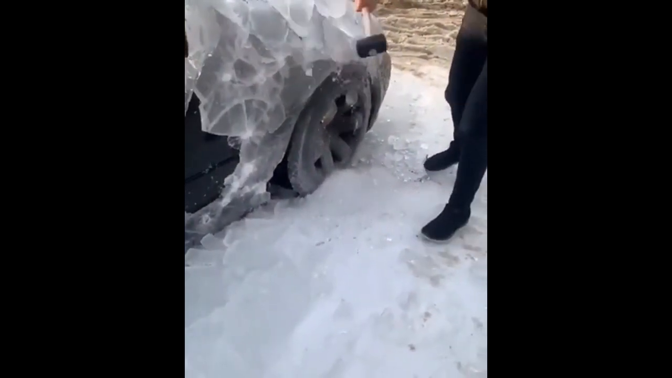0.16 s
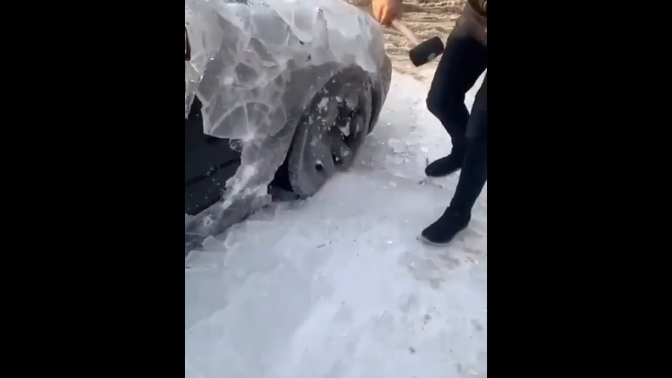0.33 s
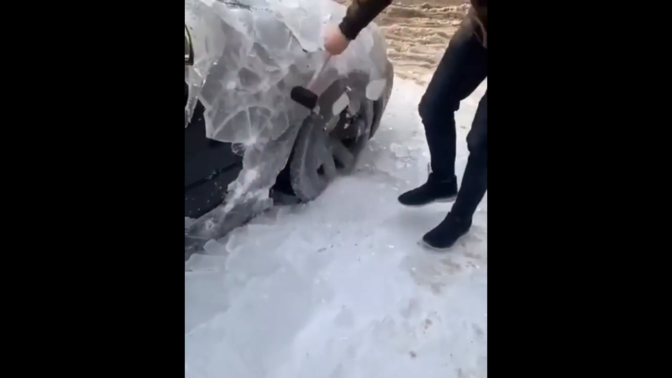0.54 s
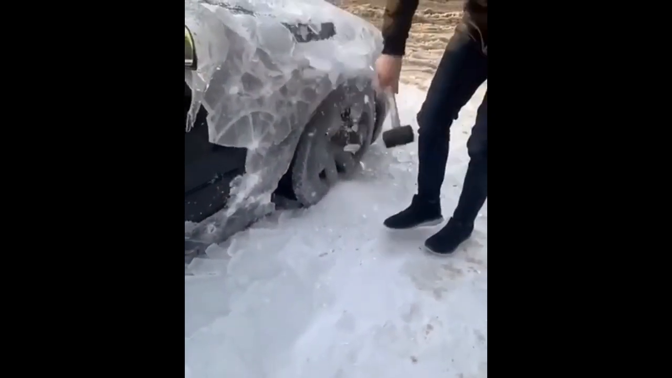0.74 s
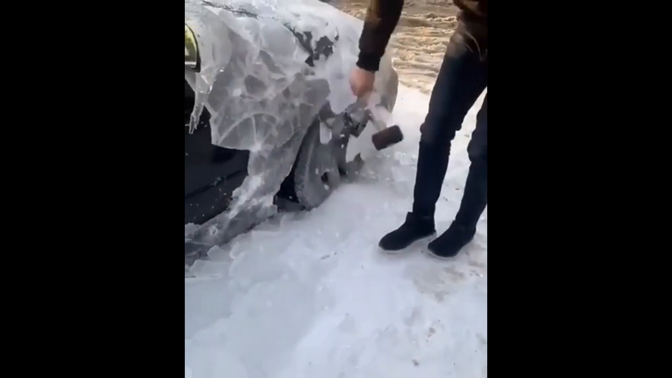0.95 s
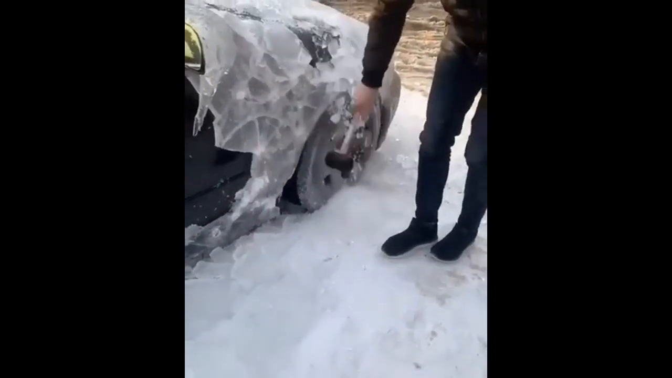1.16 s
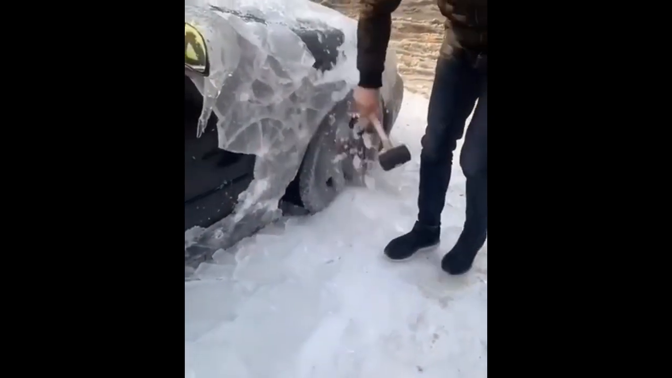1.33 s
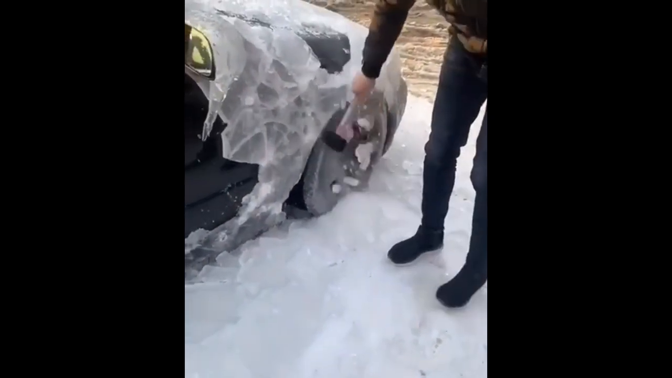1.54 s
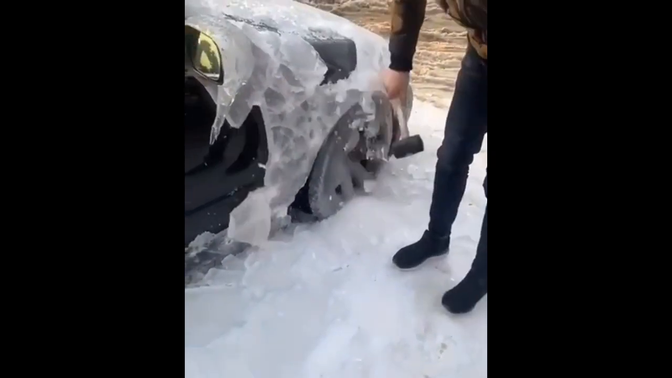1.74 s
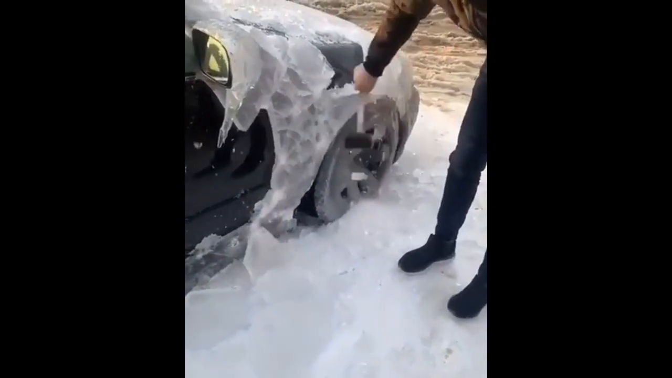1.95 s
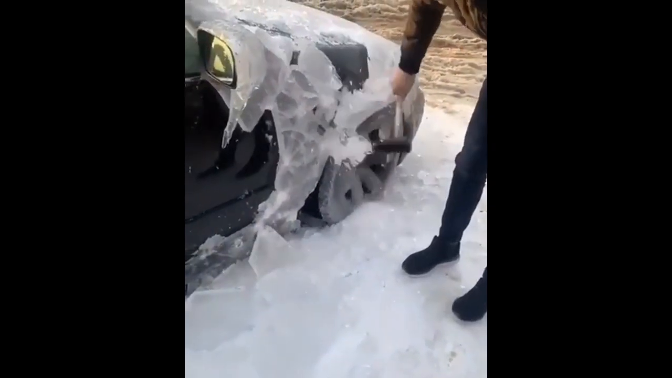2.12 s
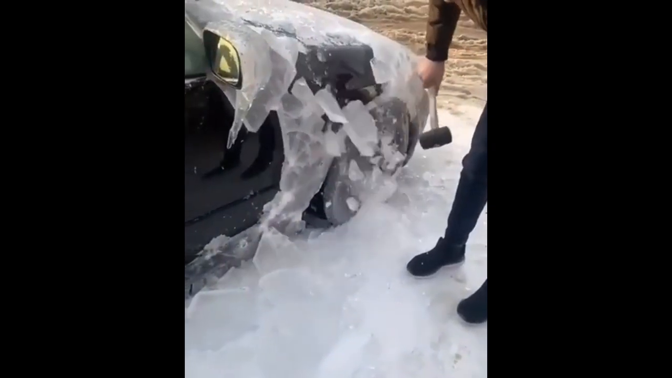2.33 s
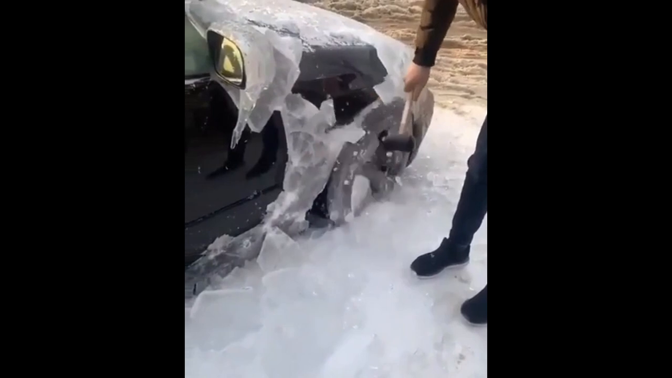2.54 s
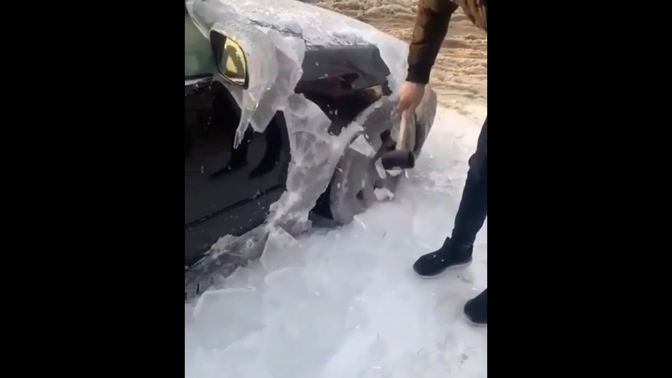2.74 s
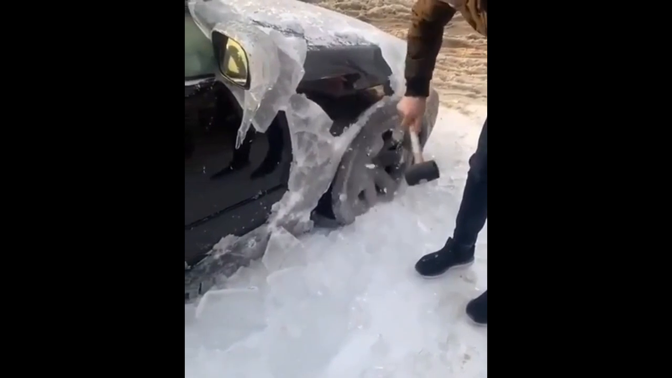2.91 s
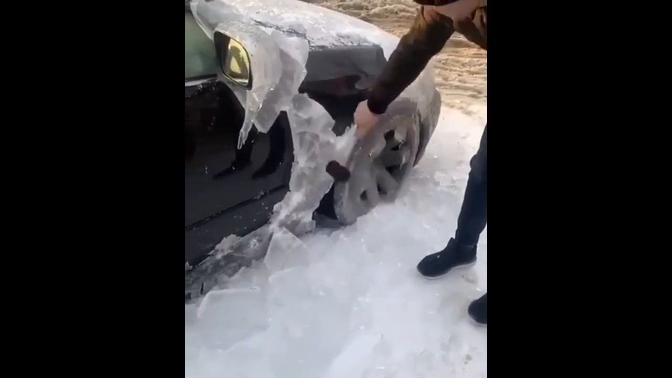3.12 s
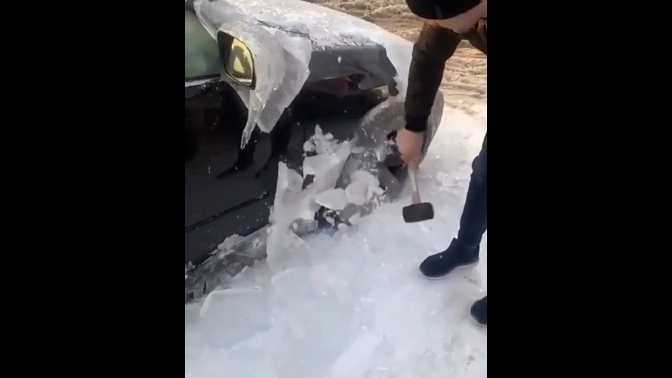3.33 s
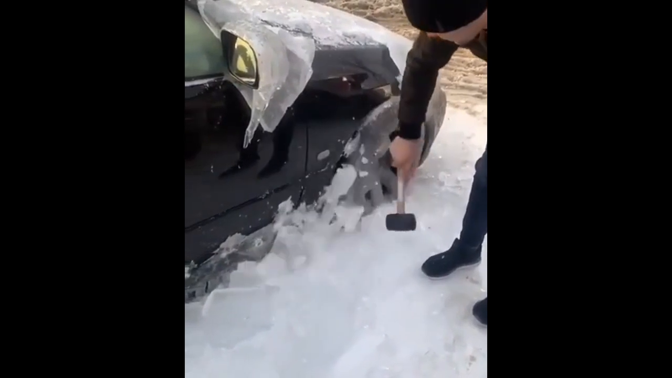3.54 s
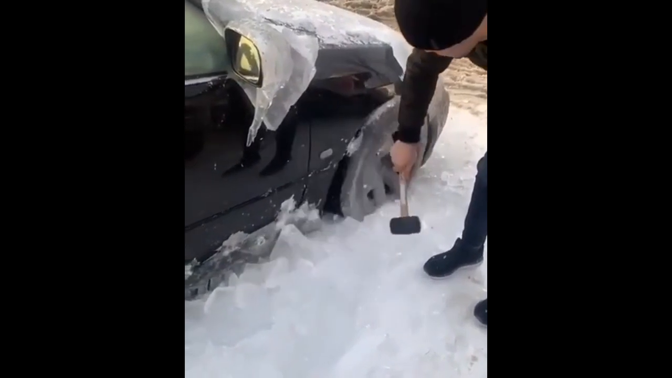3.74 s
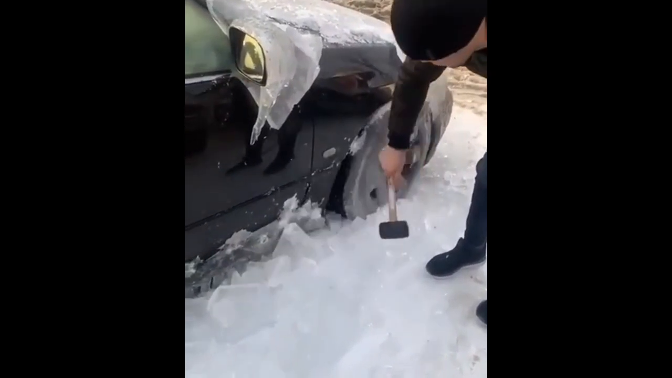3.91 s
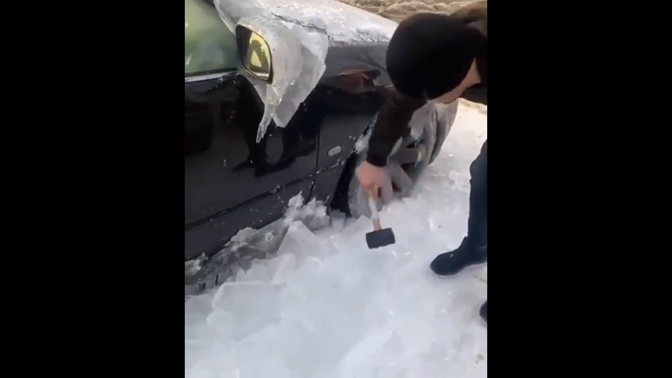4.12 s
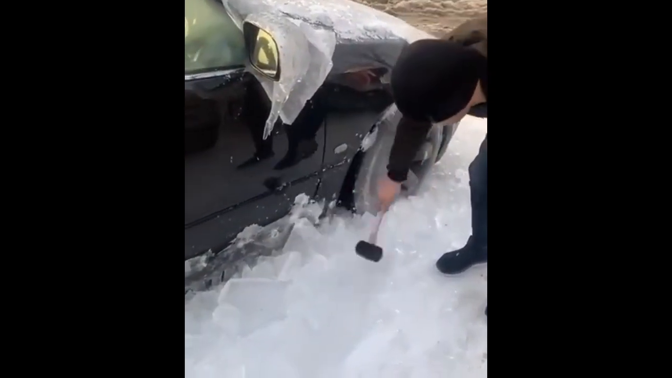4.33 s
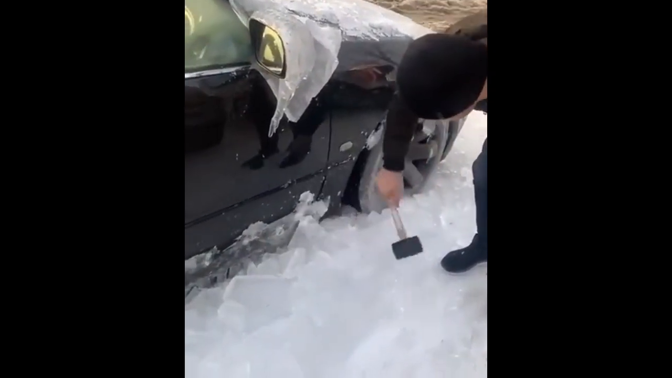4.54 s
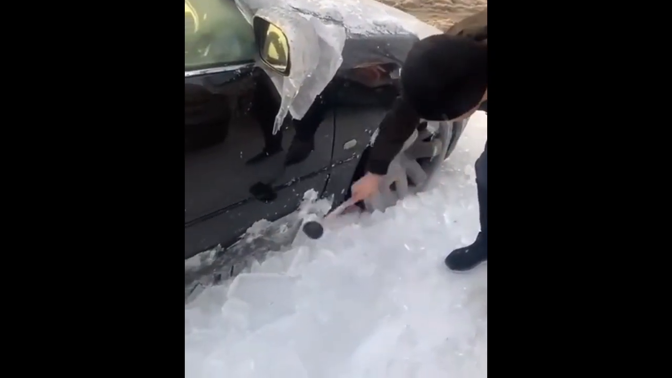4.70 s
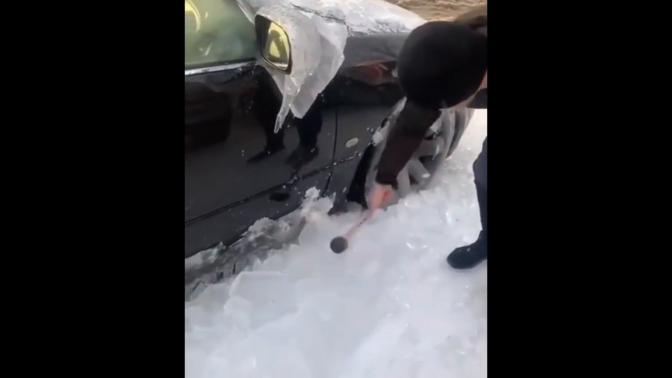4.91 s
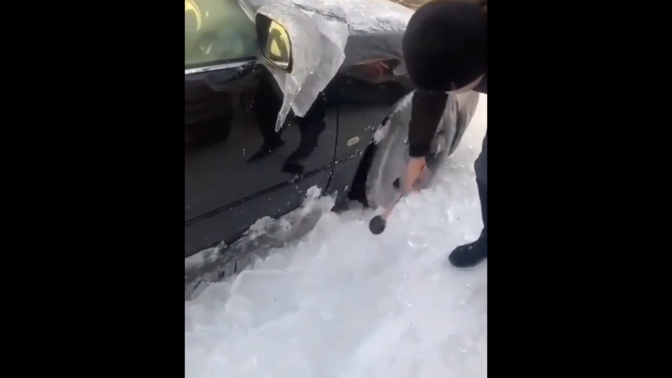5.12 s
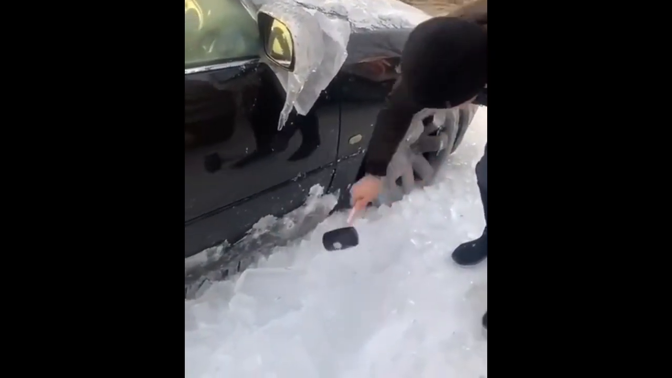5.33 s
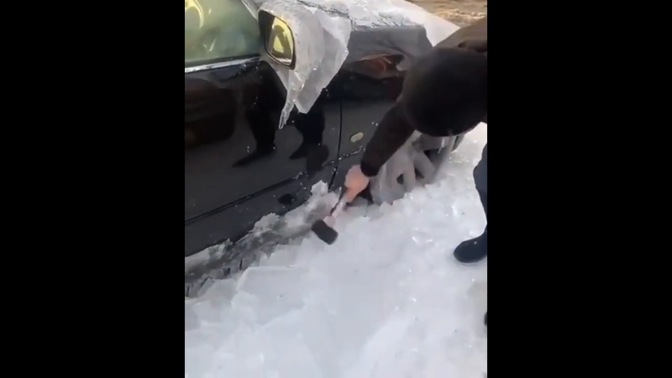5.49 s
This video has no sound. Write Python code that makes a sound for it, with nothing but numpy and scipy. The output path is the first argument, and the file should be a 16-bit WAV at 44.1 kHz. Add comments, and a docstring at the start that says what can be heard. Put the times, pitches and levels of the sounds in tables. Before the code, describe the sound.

Outdoors on snow, faint low air noise runs beneath hammer blows on a car's ice crust. Each hit clacks and thumps the panel; brittle chunks shatter, clink against the steel wheel and trickle down as crumbs. Boots shuffle during the first two seconds. Two heavy bursts of falling ice fill the middle, then sparser blows, one loud piece knocking near the end, and a final strike. Close, dry, mildly stereo.

```python
"""Outdoors in the snow a small hammer knocks a thick ice crust off the wing and bumper of a car.
From the start filtered noise rumbles faintly as open air, and for two seconds boots shuffle as swells of grains.
Nine blows follow: each cracks the ice (grain bursts), clacks the crust and thumps the panel (modes, bending wave).
After the first blow loosened chunks shatter, pieces knock and ring the steel wheel (resonators), and crumbs
trickle with clicking splinters; the ice falls thickest midway, and one more blow comes at the very end."""
import sys
import numpy as np
from scipy import signal
from scipy.fft import rfft, irfft, next_fast_len
from scipy.io import wavfile

SR = 44100
rng = np.random.default_rng(int(sys.argv[2]) if len(sys.argv) > 2 else 0)


def int16_out(signal):
    """Quantize to a 16-bit WAV file."""
    q = np.round(np.clip(np.atleast_2d(signal).T, -1, 1) * 32767)
    wavfile.write(sys.argv[1], SR, q.astype(np.int16))


N = 249606


def from_db(db):
    """Logarithmic level: decibels to amplitude gain."""
    return 10 ** (np.asarray(db) / 20)


def rms_one(x):
    """Normalisation: scale to an rms of 1."""
    return x / np.sqrt(np.mean(x ** 2) + 1e-20)


def at_hz(points, hz):
    """Interpolation on a logarithmic frequency axis of (frequency [Hz], value) points."""
    freqs, values = np.transpose(list(points))
    return np.interp(np.log(hz), np.log(freqs), values)


def stereo(mid, side):
    """Sum and difference: left and right from mid and side."""
    return np.array([mid + side, mid - side])


def add(out, s, sound):
    """Superposition: mix a sound in at time s, cut off at the end of the scene."""
    start = round(s * SR)
    room = out[:, start:start + sound.shape[-1]]
    room += sound[:, :room.shape[-1]]


def ping(hz, t60, rise_s, side_db):
    """Damped oscillation: one mode, with a quadrature side signal of random sign."""
    t = np.arange(int(t60 * SR)) / SR
    envelope = (1 - np.exp(-t / rise_s)) * from_db(-60 * t / t60)
    phase = 2 * np.pi * hz * t
    side = np.sign(rng.standard_normal()) * from_db(side_db) * np.cos(phase)
    return envelope * stereo(np.sin(phase), side)


def drift(at, per_s):
    """Low-passed noise: a smooth wander at a rate of about per_s, read at the given samples; rms 1."""
    coarse = np.arange(0, N + 32, 32)
    keep = np.exp(-2 * np.pi * per_s * 32 / SR)
    slow = signal.lfilter([1], [1, -2 * keep, keep * keep], rng.standard_normal(len(coarse)))
    return np.interp(at, coarse, rms_one(slow))


# centres of the third-octave bands [Hz]
BANDS_HZ = np.geomspace(100, 12800, 22)


def grit(per_s, spread_db, clump_db, patchy_db, width):
    """Shot noise: tiny ice fractures in clumps of changing colour, as bands x 2 x N with unit spread a band."""
    at = np.flatnonzero(rng.random(N) < per_s / SR)
    size_db = spread_db * np.minimum(rng.exponential(1, N)[at], 4.5)
    size_db += clump_db * drift(at, per_s=45)
    patches = [drift(at, per_s=11.6) for hz in BANDS_HZ]
    colours = rng.standard_normal((len(at), len(BANDS_HZ), 2))
    out = np.empty((len(BANDS_HZ), 2, N), np.float32)
    clicks = np.zeros((2, N))
    for k, hz in enumerate(BANDS_HZ):
        mid, side = colours[:, k].T * from_db(size_db + patchy_db * patches[k])
        clicks[:, at] = stereo(mid, side * from_db(at_hz(width, hz)))
        third_octave = signal.butter(2, [hz / 1.13, hz * 1.13], "band", fs=SR, output="sos")
        out[k] = signal.sosfilt(third_octave, clicks)
        out[k] /= out[k].std()
    return out


def burst(grains, s, envelopes):
    """Amplitude modulation: the grains from time s on, under one envelope a band."""
    part = grains[:, :, round(s * SR):][:, :, :envelopes.shape[1]]
    return np.einsum("bcn,bn->cn", part, envelopes[:, :part.shape[-1]])


# spectrum of the open air: (frequency [Hz], relative spectrum level [dB])
AIR = [(25, 0.5), (70, -3.5), (130, -10.5), (200, -12), (420, -24), (1200, -27.5), (2700, -37.5),
       (6500, -36), (13000, -44)]
# stereo width of air and blows: (frequency [Hz], side relative to mid [dB])
BLOW_WIDTH = [(60, -49), (140, -28), (300, -8.5), (550, -6), (1200, -5.5), (3000, -11), (9000, -5.5)]


def open_air():
    """Stationary random noise, shaped in the frequency domain: a faint, steady outdoor rumble."""
    size = next_fast_len(N)
    hz = np.maximum(np.fft.rfftfreq(size, 1 / SR), 1)
    mid, side = rfft(rng.standard_normal((2, size))) * from_db(at_hz(AIR, hz))
    side = side * from_db(at_hz(BLOW_WIDTH, hz))
    rumble = irfft(stereo(mid, side), size)[:, :N]
    return from_db(-44) * rms_one(rumble)


# grid on which the flow of loose grains is computed [s]
FLOW_TIMES = np.arange(0, N / SR + .004, .004)


def flow(start, swell_s, hold_s, t60):
    """Granular flow: loose grains get going, run for a while and come to rest."""
    age = FLOW_TIMES - start
    decay_s = np.maximum(age - swell_s - hold_s, 0)
    return np.clip(age / swell_s, 0, 1) * from_db(-60 * decay_s / t60)


# spills of crumbs, shaken loose by a blow or thrown off by a falling slab:
# (start [s], relative level [dB], brightness [dB], swell [s], hold [s], t60 [s])
SPILLS = [(0.144, -35, -3.5, 0.064, 0.03, 1.85), (0.677, -35, -0.5, 0.053, 0.14, 1.34),
          (0.822, -35, 0, 0.034, 0.025, 1.67), (1.149, -32, 3.5, 0.042, 0.038, 0.74),
          (1.616, -39.5, 0, 0.057, 0.037, 0.94), (1.913, -36, 1.5, 0.032, 0.031, 2.4),
          (2.12, -38.5, -2, 0.054, 0.11, 1.7), (2.24, -32, -1, 0.044, 0.087, 0.85),
          (2.415, -31.5, 8, 0.014, 0.04, 0.6), (2.495, -29.5, 7, 0.011, 0.06, 0.7),
          (2.609, -30.5, 5.5, 0.035, 0.115, 0.5), (2.909, -38.5, 10.5, .03, .03, 1.23),
          (3.223, -47.5, -7.5, 0.06, .05, 1), (3.37, -34, 3, 0.059, .06, 0.61),
          (3.538, -29.5, 1.5, 0.041, 0.13, 0.95), (4.333, -42.5, 0, 0.055, .02, 0.78),
          (4.47, -53.5, 10.5, 0.042, 0.081, 0.3), (4.957, -33.5, -1, 0.03, 0.075, 0.85),
          (5.26, -47.5, -4, 0.025, .11, 1.05), (5.604, -40.5, -2, 0.042, .02, .9)]
# neutral balance of a spill: body, clack, sparkle [dB]
SPILL_BALANCE_DB = [-3, -1.05, 1]
# boots shuffling on gritty snow: (start [s], relative level [dB], hold [s])
SCUFFS = [(0.0, -39, 0.19), (0.501, -35, 0.1), (1.019, -33.5, 0.12), (1.291, -30.5, 0.31),
          (1.706, -31.5, 0.19)]
# balance of a scuff: body, clack, sparkle [dB]
SCUFF_BALANCE_DB = [-11, -10.5, 0.95]


def trickle_db():
    """Incoherent addition: spills and scuffs sum in power to body, clack and sparkle levels over time."""
    power = 1e-10
    for start, level_db, bright_db, swell_s, hold_s, t60 in SPILLS:
        tilt_db = bright_db * np.array([-1, 0, 1])
        gains = from_db(level_db + np.array(SPILL_BALANCE_DB) + tilt_db)
        power = power + np.outer(gains, flow(start, swell_s, hold_s, t60)) ** 2
    for start, level_db, hold_s in SCUFFS:
        gains = from_db(level_db + np.array(SCUFF_BALANCE_DB))
        power = power + np.outer(gains, flow(start, 0.037, hold_s, t60=0.38)) ** 2
    return 10 * np.log10(power)


# frequencies of the body, clack and sparkle of ice [Hz]
ICE_REGISTERS_HZ = [450, 1500, 7500]
# spectrum of crumbs and splinters: (frequency [Hz], level relative to its register [dB])
CRUMB_COLOUR = [(100, -10.5), (200, -6.5), (450, -8.5), (900, -7.5), (1800, -3.5), (2900, -15),
                (4000, -9.5), (5000, -16.5), (6300, -6), (8700, -11), (10500, -10.5), (13000, -13)]


def crumbs(grains, registers, level_db):
    """Granular noise: crumbs slide down the panel, patter on the frozen ground and grind underfoot."""
    out, t = np.zeros((2, N)), np.arange(N) / SR
    # share of each register in each band
    shares = np.transpose([at_hz(zip(ICE_REGISTERS_HZ, one), BANDS_HZ) for one in np.eye(len(registers))])
    gains = from_db(level_db + shares @ registers + at_hz(CRUMB_COLOUR, BANDS_HZ)[:, None])
    for band, gain in zip(grains, gains):
        out += band * np.interp(t, FLOW_TIMES, gain)
    return out


# stereo width of loose ice: (frequency [Hz], side relative to mid [dB])
ICE_WIDTH = [(100, -42), (450, -6), (1200, -15.5), (4000, -6), (8000, -5.5), (13000, -8.5)]


def shards(registers, count, crowding, spread_db, level_db):
    """Plate modes scale with size: splinters, densest in thick spills, click higher and shorter when small."""
    out = np.zeros((2, N))
    fallen = np.cumsum(from_db(crowding * registers[1]))
    for when, smallness, fall in rng.random((count, 3)):
        s = np.interp(when, fallen / fallen[-1], FLOW_TIMES)
        lowest_hz = 450 * 14 ** smallness
        here = [(hz, np.interp(s, FLOW_TIMES, level)) for hz, level in zip(ICE_REGISTERS_HZ, registers)]
        strength_db = -spread_db * np.log(max(fall, .06))
        for hz in lowest_hz * np.array([1, 1.47, 2.1]):
            t60 = .025 * (hz / 1000) ** -.25
            gain = from_db(level_db + strength_db + at_hz(here, hz) + at_hz(CRUMB_COLOUR, hz))
            add(out, s, gain * ping(hz, t60, rise_s=0.0006, side_db=at_hz(ICE_WIDTH, hz)))
    return out


# ice chunks breaking off, landing or being crushed: (time [s], relative body level [dB],
# relative clack level [dB], relative sparkle level [dB], t60 [s], ring frequency [Hz])
CHUNKS = [(0.256, -38, -29.5, -19.5, 0.091, 6200), (0.571, -42, -69, -27.5, 0.031, 9470),
          (0.64, -33, -23, -21.5, 0.14, 4250), (0.8235, -30, -27.5, -19, 0.085, 6340),
          (0.961, -39, -26.5, -32, 0.034, 11700), (1.106, -49, -35, -33.5, 0.25, 7600),
          (1.162, -27, -29, -48, 0.041, 510), (1.249, -44, -30, -21, 0.033, 8700),
          (1.278, -21.5, -25, -23, 0.071, 6580), (1.443, -32, -33, -84, 0.026, 1130),
          (1.771, -53, -35, -28.5, 0.053, 8660), (1.891, -28.5, -20, -22, 0.16, 9100),
          (1.92, -24, -26, -25.5, 0.078, 8600), (2.1, -38, -21, -29, 0.053, 5640),
          (2.281, -37, -26.5, -39, 0.086, 526), (2.357, -49, -30, -30, 0.056, 1160),
          (2.372, -30, -26, -34, 0.084, 1610), (2.425, -32.5, -36, -32, 0.068, 1420),
          (2.495, -28.5, -26, -22.5, 0.25, 3970), (2.621, -31, -30, -50, 0.04, 1140),
          (2.673, -22, -26.5, -23, 0.049, 1900), (2.685, -30, -43, -25, 0.029, 5570),
          (2.733, -33.5, -22, -46, 0.049, 477), (2.755, -33, -48, -38, 0.024, 7640),
          (2.945, -32, -28.5, -25.5, 0.071, 4080), (3.032, -37.5, -45, -26.5, 0.097, 7000),
          (3.121, -54, -65, -31.5, 0.029, 5400), (3.433, -31, -20.5, -34, 0.12, 1474),
          (3.455, -32, -47, -55, 0.078, 633), (3.506, -29.5, -28, -23, 0.12, 5800),
          (3.54, -35, -32, -28.5, 0.1, 830), (3.566, -35, -22.5, -18.5, 0.092, 2580),
          (3.596, -39, -25, -27, 0.13, 6450), (3.6124, -25, -10.5, -55, 0.046, 1710),
          (3.645, -29.5, -29, -34, 0.11, 790), (3.709, -34, -35, -38, 0.066, 1880),
          (3.796, -51, -27, -39, 0.19, 2050), (3.839, -38, -45, -39, 0.04, 1340),
          (3.922, -56, -50, -48, 0.2, 1890), (4.09, -35, -33, -42.5, 0.036, 8960),
          (4.172, -39, -37, -46, 0.044, 2190), (4.392, -39, -59, -50, 0.064, 650),
          (4.485, -56, -53, -46, 0.023, 2380), (4.512, -53, -75, -38.5, 0.11, 11600),
          (4.61, -62, -50, -45, 0.039, 6440), (4.842, -73, -68, -39, 0.03, 6500),
          (4.954, -32, -32, -35, 0.14, 6600), (4.967, -28, -27, -37, 0.038, 1790),
          (4.984, -24.5, -25, -36, 0.076, 4000), (5.018, -30, -31, -48, 0.028, 1540),
          (5.042, -34, -27, -59, 0.034, 1160), (5.087, -44, -43, -38, 0.032, 6300),
          (5.187, -38.5, -57, -59, 0.045, 1750), (5.251, -50, -43, -78, 0.045, 1530),
          (5.308, -68.5, -38, -43, 0.053, 4320), (5.328, -65, -43, -65, 0.04, 1460),
          (5.434, -70, -66, -51, 0.028, 6960)]
# spectrum of a shattering chunk: (frequency [Hz], level relative to its register [dB])
CHUNK_COLOUR = [(100, -13.5), (220, -8.5), (500, -1), (800, -3), (1100, -10), (1700, -6.5), (3000, -16),
                (4000, -9), (5000, -15.5), (6500, -6), (8500, -9), (13000, -50)]


def chunks(grains, rise_share, ring_db, ring_share, overtone_db, uneven_db, level_db):
    """Brittle fracture: a chunk clinks with a few plate modes and shatters into a dying spray of grains."""
    out, t = np.zeros((2, N)), np.arange(SR // 6) / SR
    for s, *register_db, t60, ring_hz in CHUNKS:
        registers = list(zip(ICE_REGISTERS_HZ, register_db))
        # short clinks start sharply, long crunches build up
        rise_s = rise_share * t60
        colour_db = at_hz(CHUNK_COLOUR, BANDS_HZ) + uneven_db * rng.standard_normal(len(BANDS_HZ))
        gain = from_db(level_db + colour_db + at_hz(registers, BANDS_HZ))
        envelope = (1 - np.exp(-t / rise_s)) * from_db(-60 * t / t60)
        add(out, s, burst(grains, s, gain[:, None] * envelope))
        other_hz = np.exp(rng.uniform(np.log(1300), np.log(11000), size=5))
        for hz, mode_db in [(ring_hz, ring_db)] + [(hz, overtone_db) for hz in other_hz]:
            # cracked ice damps its high modes quickly
            ring_t60 = min(ring_share * t60, .07 * (hz / 1000) ** -.25)
            gain = from_db(mode_db + at_hz(registers, hz))
            add(out, s, gain * ping(hz, ring_t60, rise_s, side_db=-36))
    return out


# solid pieces of ice knocking on the car or the frozen ground:
# (time [s], relative level [dB], pitch [Hz], t60 [s], click relative to the knock [dB])
KNOCKS = [(0.2599, -23.5, 4160, .015, 2), (0.8302, -25, 4200, 0.0089, 4), (0.964, -25, 2460, 0.011, 5),
          (1.251, -21, 5630, 0.019, -13), (1.2813, -25.5, 1500, 0.014, -1), (1.547, -28.5, 6280, 0.022, -4),
          (1.778, -31, 7100, .01, -5), (1.9247, -24, 4200, .012, 6), (2.356, -33, 1170, 0.013, -12),
          (2.38, -24, 188, 0.16, -30), (2.447, -22, 2240, 0.025, -10), (2.515, -26, 3980, 0.045, -4),
          (2.541, -7.5, 2090, 0.013, -13), (2.561, -22.5, 1030, .02, -10), (2.597, -25.5, 2010, 0.036, -11),
          (2.674, -16.5, 1450, 0.019, -15), (2.689, -24, 2100, 0.025, -8), (2.758, -25, 1450, .02, -5),
          (3.434, -21, 934, 0.053, -19), (3.5058, -19, 1054, 0.036, -0.5), (3.5678, -17.5, 2190, 0.027, -2),
          (3.6127, -9, 1224, 0.023, -21), (3.642, -20.5, 536, 0.045, -15), (3.708, -22, 565, 0.029, -14),
          (3.798, -26, 1730, 0.023, -14), (4.9696, -4.5, 634, 0.014, -14), (4.989, -23.5, 1630, 0.032, -21),
          (4.9955, -26, 2100, .015, -1), (5.02, -35, 1520, .02, -10), (5.046, -30, 1890, .025, -18)]
# modes of such a piece: (multiple of its pitch [1], relative level [dB])
PIECE_MODES = [(0.43, -10), (0.71, -2), (1.0, 2.5), (1.33, -13), (1.87, -43)]


def pieces(rise_cycles, click_t60, level_db):
    """Impact excitation: a solid piece lands with a sharp noise click and a short, hollow ring of plate modes."""
    out, t = np.zeros((2, N)), np.arange(SR // 30) / SR
    for s, knock_db, pitch_hz, t60, click_db in KNOCKS:
        gain = from_db(level_db + knock_db)
        for k, (multiple, mode_db) in enumerate(PIECE_MODES):
            mode = ping(pitch_hz * multiple, t60, rise_cycles / pitch_hz, side_db=-35)
            add(out, s, (-1) ** k * gain * from_db(mode_db) * mode)
        mid, side = rng.standard_normal((2, len(t)))
        click = from_db(click_db - 60 * t / click_t60) * stereo(mid, side / 2)
        add(out, s, gain * click)
    return out


def loose_ice():
    """Common origin: chunks, pieces, crumbs and splinters all break from the same brittle crust."""
    grains = grit(per_s=3000, spread_db=1.6, clump_db=0.7, patchy_db=3.5, width=ICE_WIDTH)
    falling = chunks(grains, rise_share=0.057, ring_db=5.5, ring_share=1.0,
                     overtone_db=0.5, uneven_db=0.9, level_db=1.5)
    falling += pieces(rise_cycles=0.6, click_t60=0.012, level_db=-1.0)
    registers = trickle_db()
    falling += crumbs(grains, registers, level_db=-5.5)
    falling += shards(registers, count=450, crowding=.25, spread_db=2.5, level_db=3.0)
    return falling


# modes of the steel wheel: (frequency [Hz], bandwidth [Hz], relative level [dB])
WHEEL_MODES = [(1293, 45, 1), (2660, 55, 7), (4008, 80, -1), (5790, 200, -4)]


def wheel(ice, level_db):
    """Resonance: falling ice strikes the steel wheel, which rings briefly at its modes."""
    out = np.zeros((2, N))
    for hz, width_hz, mode_db in WHEEL_MODES:
        resonator = signal.iirpeak(hz, hz / width_hz, fs=SR)
        out += from_db(level_db + mode_db) * signal.lfilter(*resonator, ice)
    return out


def snaps(t, first_s, gap_s, length_s, growth_db, count):
    """Stick-slip envelope: a crack runs in a few unevenly spaced jumps, each growth_db above the last."""
    gaps = gap_s * rng.uniform(.5, 1.5, count)
    ages = t - (first_s + np.cumsum(gaps) - gaps[0])[:, None]
    jumps = (ages > 0) * np.exp(-np.abs(ages) / length_s)
    return from_db(growth_db * np.arange(count)) @ jumps


# hammer blows: (time [s], relative levels of thump [dB], boom [dB], knock [dB], clack [dB], crack [dB],
# relative ring of the panel [dB], travel time of a 100 Hz bending wave [s])
BLOWS = [(0.138, -21, -23, -31.5, -28, -36, -0.5, 0.013), (0.659, -25, -23, -17.5, -28, -37, -7.5, .014),
         (1.1387, -24, -23, -17.5, -28.5, -37, -4.5, 0.011),
         (1.592, -26.5, -24, -22, -29, -34.5, -0.5, 0.013),
         (2.0892, -31, -24.5, -27.5, -26.5, -35, 3, .015),
         (3.2239, -28, -24, -25.5, -26, -37.5, -1.5, .028),
         (4.3092, -34, -27.5, -18, -33.5, -39, 0.5, .022),
         (4.8972, -33, -33.5, -28, -44.5, -44, 0.5, 0.01333),
         (5.5996, -30.5, -23.5, -15.5, -25.5, -41, -0.5, 0.014)]
# frequencies of those five registers, thump to crack [Hz]
BLOW_REGISTERS_HZ = [65, 150, 450, 1400, 5000]
# spectrum of the crack: (frequency [Hz], level relative to its register [dB])
FRACTURE = [(100, -18), (300, -13), (600, -6.5), (820, -10.5), (1200, -5), (2000, -3), (3000, -5),
            (4000, -1.5), (5000, -2.5), (6500, 5), (9000, -7.5), (13000, -4.5)]


def cracks(crush_s, rise_s, t60_at_1k, damping, tail_db, tail_t60, snap_db, level_db):
    """Fracture and scattering: the crust is crushed and snaps; the crack scatters off car and ground."""
    out, t = np.zeros((2, N)), np.arange(SR // 3) / SR
    grains = grit(per_s=9000, spread_db=1.5, clump_db=-1.0, patchy_db=2.0, width=BLOW_WIDTH)
    t60 = t60_at_1k * (BANDS_HZ[:, None] / 1000) ** -damping
    direct = from_db(-60 * np.maximum(t - crush_s, 0) / t60)
    scattered = from_db(tail_db - 60 * t / tail_t60)
    envelope = (1 - np.exp(-t / rise_s)) * np.hypot(direct, scattered)
    for s, *register_db, ring_db, travel_s in BLOWS:
        jumps = from_db(snap_db) * snaps(t, first_s=crush_s / 2, gap_s=0.0057, length_s=0.00098,
                                         growth_db=1.0, count=4)
        blow_db = at_hz(zip(BLOW_REGISTERS_HZ, register_db), BANDS_HZ)
        gain = from_db(level_db + at_hz(FRACTURE, BANDS_HZ) + blow_db)
        # crushing starts ahead of the blow time, where the first jump falls
        add(out, s - crush_s / 2, burst(grains, s, gain[:, None] * (envelope + jumps)))
    return out


# modes of the patch of crust and panel under the hammer, one row a blow:
# (frequency [Hz], relative level [dB])
SPOT_MODES = [
    [(128, -2), (1001, -17), (1245, -18.5), (1900, -16), (2622, -20.5), (3849, -16)],
    [(1254, -14), (2595, -36), (4129, -22.5)],
    [(1200, -17), (1599, -23), (1798, -13.5), (2660, -15), (3957, -18)],
    [(1180, -15), (1577, -13), (1787, -14), (3510, -16)],
    [(974, -15), (1426, -16), (1771, -15.5), (2309, -22.5), (4253, -19)],
    [(1292, -10.5), (1720, -27), (2654, -11.5), (4597, -21)],
    [(247, -2), (355, -18), (1041, -18), (1190, -11), (1550, -16.5), (4143, -37), (5600, -18)],
    [(1560, -21.5), (1797, -19.5), (2100, -29), (2668, -32)],
    [(141, -11), (667, -2), (1122, -25), (1527, -19.5), (1830, -12), (2178, -18)],
]


def struck_spot(t60_at_1k, rise_cycles, level_db):
    """Local modes: the patch under the hammer has a hard clack of its own; its higher modes die sooner."""
    out = np.zeros((2, N))
    for (s, *_), modes in zip(BLOWS, SPOT_MODES):
        for k, (hz, mode_db) in enumerate(modes):
            mode_t60 = t60_at_1k * (hz / 1000) ** -.3
            mode = ping(hz, mode_t60, rise_cycles / hz, side_db=-36)
            add(out, s, (-1) ** k * from_db(level_db + mode_db) * mode)
    return out


# spectrum of the bending wave: (frequency [Hz], level relative to its register [dB])
BENDING_COLOUR = [(30, -22), (70, 5.5), (100, -4.5), (130, 4.5), (200, -2.5), (340, -9.5), (600, -6.5),
                  (800, -34), (1200, -13.5), (2400, -19), (6000, -83)]


def bending_wave(front_hz, level_db):
    """Dispersion: low pitches travel slower in the panel, so the clack sweeps down into a solid thump."""
    out, size = np.zeros((2, N)), SR // 4
    hz = np.maximum(np.fft.rfftfreq(size, 1 / SR), 1)
    margin_s = .02  # room for pitches that arrive before the front
    for s, *register_db, ring_db, travel_s in BLOWS:
        delay = margin_s + travel_s * (np.sqrt(100 / hz) - np.sqrt(100 / front_hz))
        blow_db = at_hz(zip(BLOW_REGISTERS_HZ, register_db), hz)
        gain = from_db(level_db + at_hz(BENDING_COLOUR, hz) + blow_db)
        # phase is the integral of group delay over frequency
        phase = 2 * np.pi * np.cumsum(delay) * SR / size
        wave = irfft(gain * np.exp(-1j * phase), size)
        add(out, s - margin_s, stereo(wave, 0))
    return out


# modes of the ice-laden panel (low) and of the crust itself (high):
# (frequency [Hz], relative level [dB], t60 [s])
MODES_OF_WING = [(59.3, 7, 0.45), (77.7, 6, 0.22), (103, 3, 0.06), (130.2, 0, 0.44), (157.2, 0, 0.41),
                 (187.3, 4, 0.32), (226.7, 9.5, 0.15), (297.3, 1, 0.088), (344.4, 6.5, 0.12),
                 (425, -4, 0.091), (479, -1.5, 0.091), (590, 4.5, 0.017), (981, 7, 0.13), (1254, 1, 0.12),
                 (1556, -22, 0.11), (1840, -17, 0.21)]


def wing(rise_cycles, uneven_db, detune, level_db):
    """Modal superposition: every blow rings panel and crust, with mode strengths and pitches drawn anew."""
    out, t = np.zeros((2, N)), np.arange(SR // 4) / SR
    hz, mode_db, t60 = np.transpose(MODES_OF_WING)[:, :, None]
    for s, *register_db, ring_db, travel_s in BLOWS:
        # each mode starts when the bending wave of its pitch arrives
        age = np.maximum(t - travel_s * np.sqrt(100 / hz), 0)
        envelope = (1 - np.exp(-age * hz / rise_cycles)) * from_db(-60 * age / t60)
        strength, stiffness, lean = rng.standard_normal((3, len(hz), 1))
        blow_db = ring_db + at_hz(zip(BLOW_REGISTERS_HZ, register_db), hz)
        height = envelope * from_db(level_db + mode_db + blow_db + uneven_db * strength)
        phase = 2 * np.pi * hz * (1 + detune * stiffness) * age
        side = np.sign(lean) * from_db(at_hz(BLOW_WIDTH, hz)) * np.cos(phase)
        add(out, s, stereo((height * np.sin(phase)).sum(0), (height * side).sum(0)))
    return out


def scene():
    """Linear superposition of the open air, the falling ice, the wheel and the hammer blows."""
    air = open_air()
    ice = loose_ice()
    ringing_wheel = wheel(ice, level_db=-11)
    fractures = cracks(crush_s=0.0076, rise_s=0.0025, t60_at_1k=0.092, damping=0.55,
                       tail_db=2.0, tail_t60=0.13, snap_db=-6.0, level_db=3.5)
    knocks = struck_spot(t60_at_1k=0.046, rise_cycles=1.2, level_db=1.0)
    knocks += bending_wave(front_hz=5100, level_db=59.0)
    knocks += wing(rise_cycles=0.75, uneven_db=3.0, detune=0.015, level_db=-5.0)
    return air + ice + ringing_wheel + fractures + knocks


def record(dry):
    """Band limiting and saturation: the microphone sheds deep bass, peaks are rounded, the top is cut."""
    ceiling, low_cut_hz, top_cut_hz = .95, 42, 13300
    thinned = signal.sosfilt(signal.butter(2, low_cut_hz, "high", fs=SR, output="sos"), dry)
    rounded = ceiling * np.tanh(thinned / ceiling)
    return signal.sosfilt(signal.ellip(10, .2, 80, top_cut_hz, fs=SR, output="sos"), rounded)


dry = scene()
out = record(dry)
int16_out(out)
```